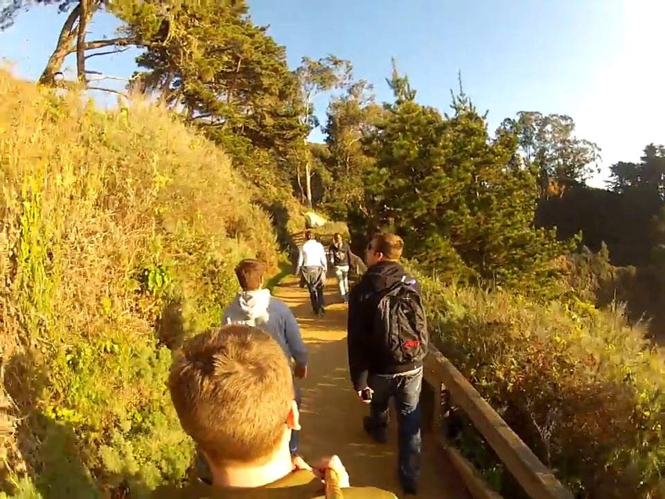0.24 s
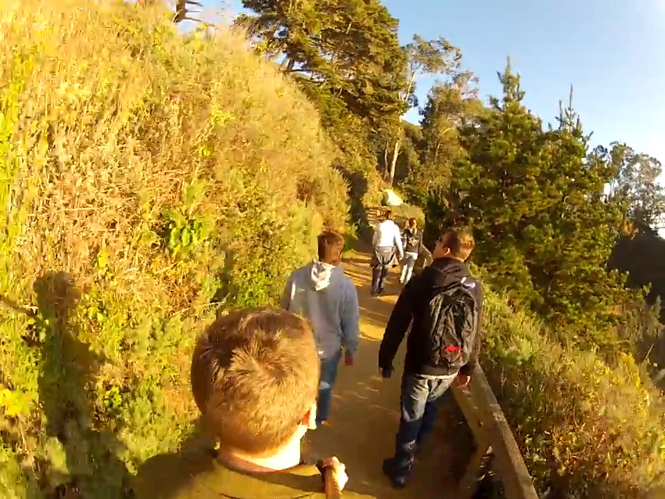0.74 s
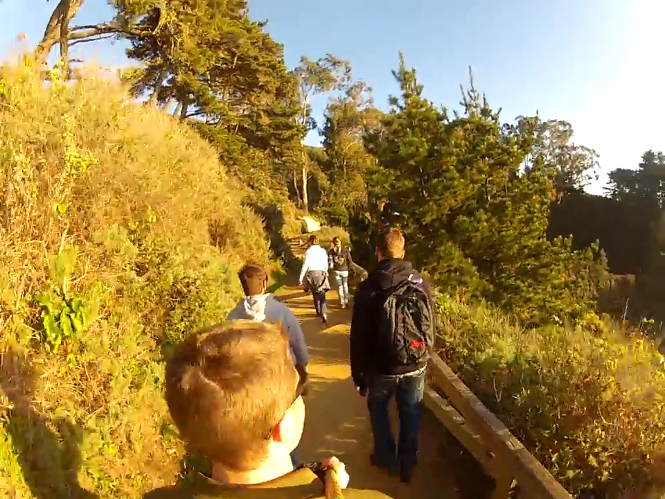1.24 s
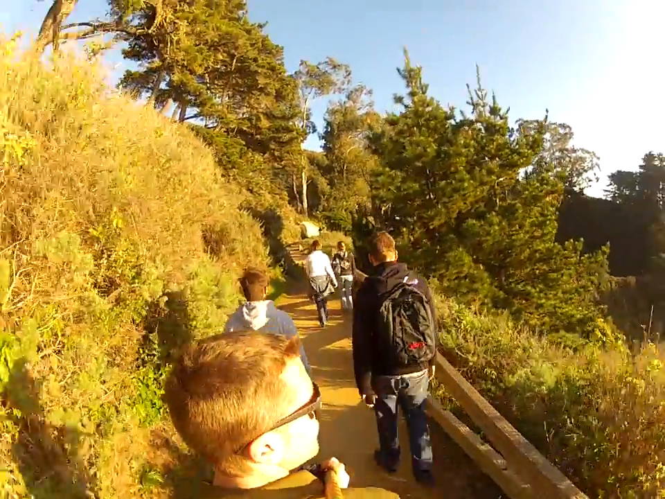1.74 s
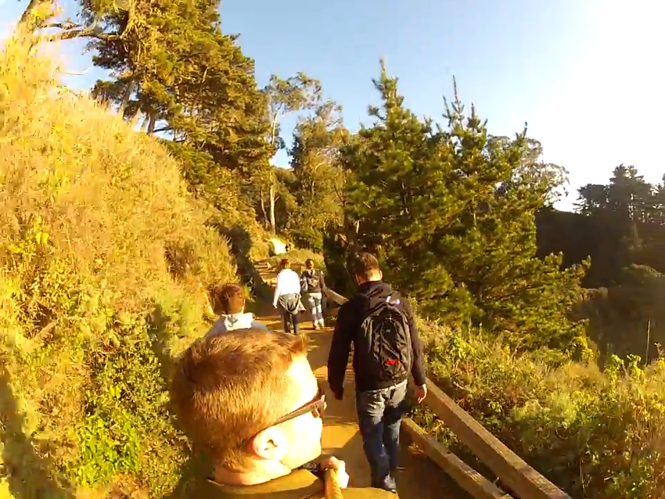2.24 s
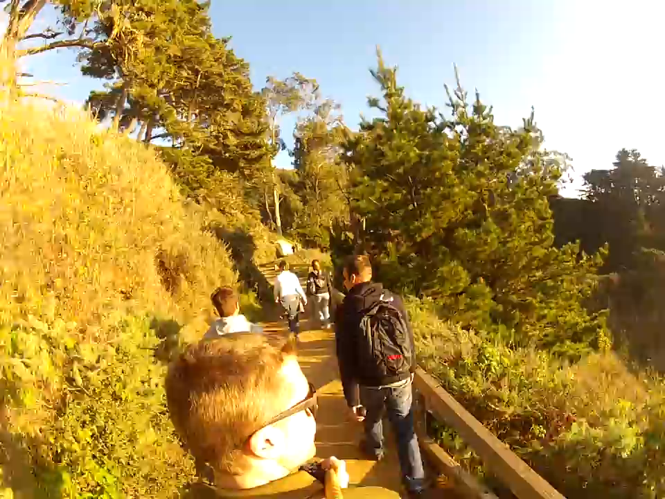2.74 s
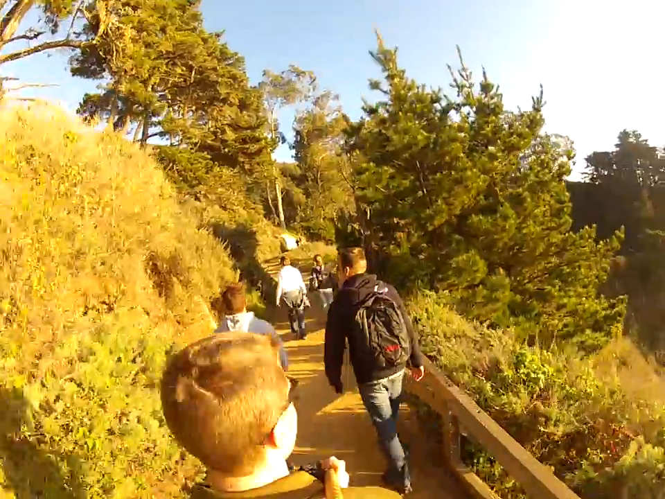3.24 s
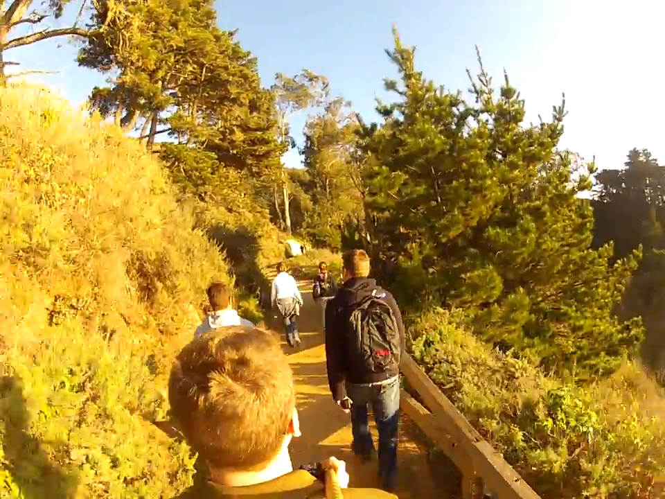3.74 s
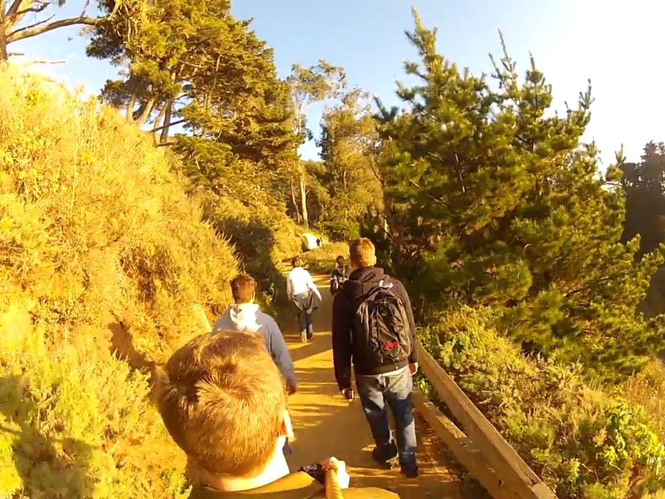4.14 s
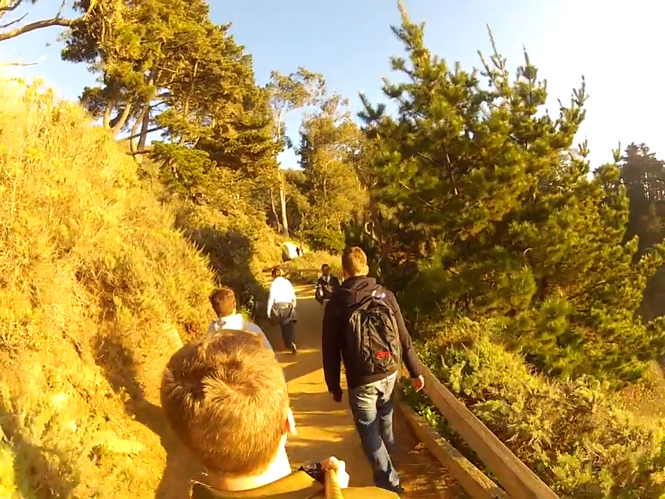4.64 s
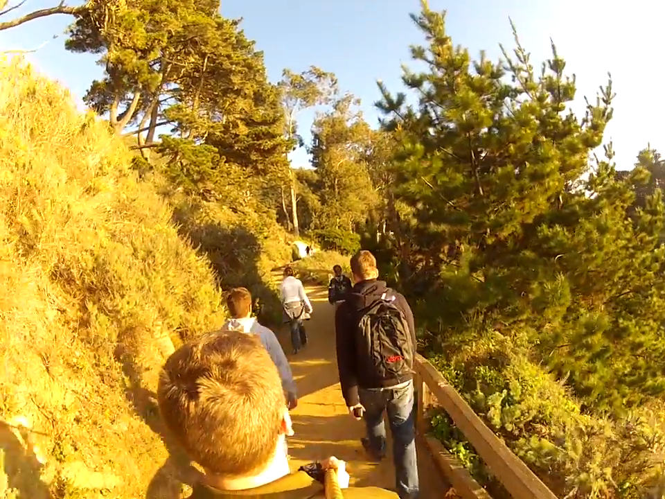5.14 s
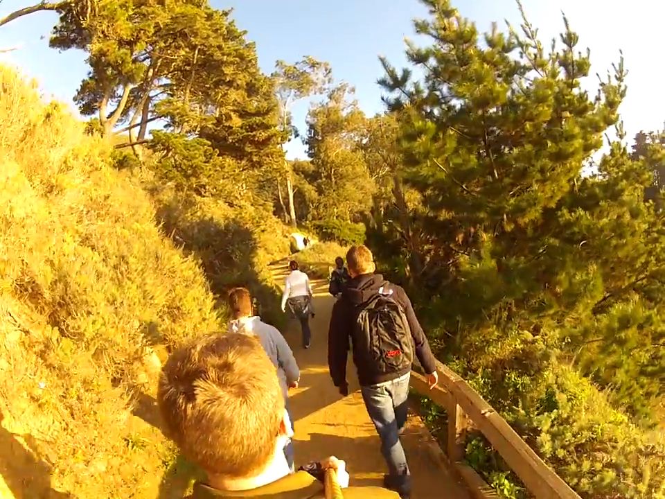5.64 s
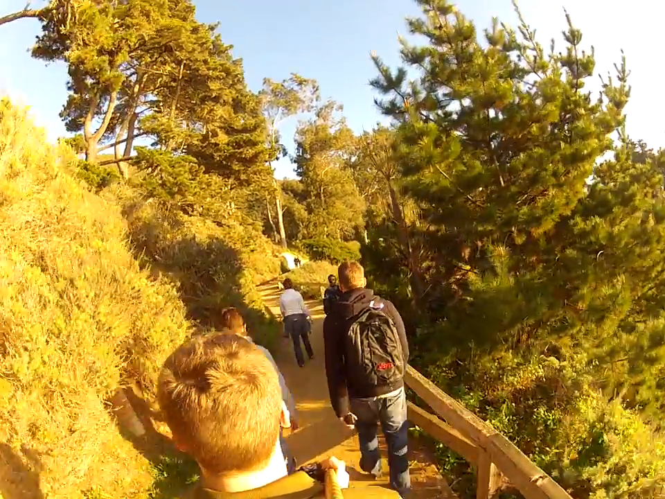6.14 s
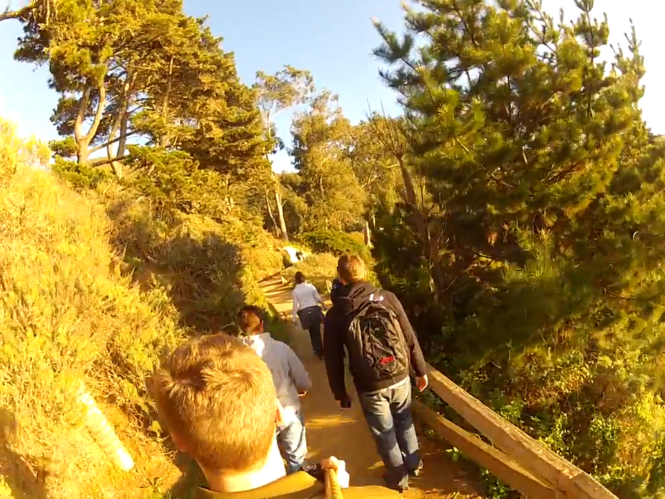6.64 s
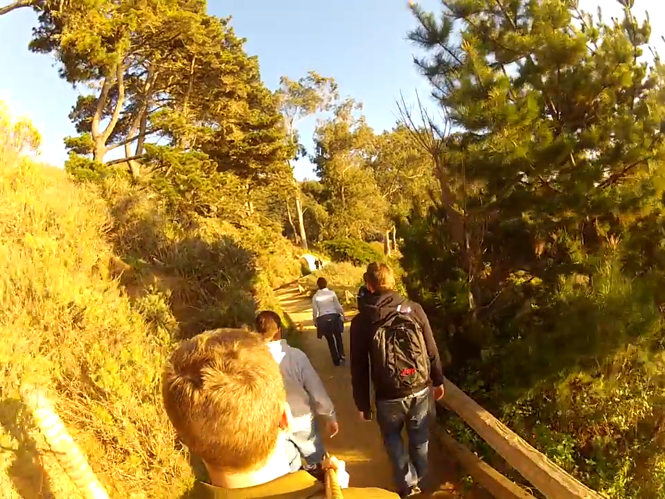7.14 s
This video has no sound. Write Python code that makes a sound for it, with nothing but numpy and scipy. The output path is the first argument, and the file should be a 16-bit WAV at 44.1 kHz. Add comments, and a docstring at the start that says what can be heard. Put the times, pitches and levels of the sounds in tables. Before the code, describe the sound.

A cased camera shakes on its pole: sharp clacks and low thuds in the first second, another burst near two seconds, then quiet ticking and rubbing.

```python
"""Knocks of the mount ring out as a small camera in a sealed plastic case rides a pole along a dirt trail.
Each step shakes the pole: low modes thump and shudder, a deep sine sways, and gritty noise rubs.
All of it rings through the case, over a faint hiss of filtered noise.
The sound is sampled only 8000 times a second and each sample is held, which mirrors it into the treble."""
import sys
import numpy as np
from scipy import signal
from scipy.fft import rfft, irfft
from scipy.io import wavfile
from scipy.ndimage import uniform_filter1d

SR = 44100
rng = np.random.default_rng(int(sys.argv[2]) if len(sys.argv) > 2 else 0)


def attenuation_scalar(level_db):
    """Turn a level in dB into a linear amplitude multiplier (20 dB per decade)."""
    decades = np.asarray(level_db, float) / 20
    return 10 ** decades


def unload_audio(sound):
    """Save the sound as a 16-bit wav file, at the path given as the first command line argument."""
    columns = np.transpose(np.atleast_2d(sound))
    # keep every value between -1 and 1, then stretch to whole-number steps
    steps = np.round(np.clip(columns, -1, 1) * 32767)
    wavfile.write(sys.argv[1], SR, steps.astype(np.int16))


N = 326781  # length in samples

# knocks of the mount: start_s, bright_peak_db, favoured_bright_hz, middle_level_db, contact_decay_s
MOUNT_KNOCKS = [(0.0491, -31, 1860, -45, 0.0091), (0.1322, -6, 2210, -35, 0.0038),
                (0.2183, -14, 1820, -43, 0.0029), (0.298, -38, 2050, -38.5, 0.0051),
                (0.3267, -17.5, 2100, -29, 0.002), (0.3544, -22.5, 2050, -35.5, 0.0031),
                (0.44, -40, 2050, -39.5, 0.005), (0.5857, -29, 2070, -45, 0.011),
                (0.7013, -33, 2040, -40.5, 0.0022), (0.7451, -17.5, 1920, -28, 0.0014),
                (0.8176, -30, 2000, -55, 0.0045), (0.8912, -10, 1780, -23.5, 0.0037),
                (0.9526, -16, 3530, -34, 0.0033), (0.9964, -39, 1570, -55, 0.0046),
                (1.2845, -50, 2020, -52, 0.0058), (1.4473, -37.5, 2080, -68, 0.0079),
                (1.476, -38, 2040, -68, 0.002), (1.5395, -38.5, 2000, -64, 0.01),
                (1.809, -37, 2540, -63, 0.0054), (1.8449, -32, 2230, -65, 0.0026),
                (1.873, -33, 1960, -51, 0.004), (1.908, -10, 1780, -24.5, 0.0028),
                (1.9417, -19, 2300, -29, 0.0031), (2.0058, -19, 2350, -29.5, 0.0027),
                (2.0958, -37.5, 1943, -44, 0.0023), (2.432, -54, 1750, -62, 0.0067),
                (2.5698, -33, 2170, -78, 0.012), (2.606, -31.5, 1850, -64, 0.0039),
                (2.978, -45.5, 1770, -56.5, 0.0018), (3.2207, -40, 2040, -56, 0.011),
                (3.5247, -41, 2570, -58, 0.0032), (3.5418, -45, 2020, -49.5, 0.0032),
                (3.557, -43.5, 2050, -49.5, 0.0062), (3.575, -43, 2070, -56, 0.0027),
                (3.677, -51, 1990, -58, 0.0066), (3.7319, -36.5, 2060, -58.5, 0.0051),
                (3.8427, -28.5, 1550, -56, 0.0056), (3.8683, -33, 1910, -59, 0.0038),
                (4.058, -37.5, 2070, -48, 0.012), (4.121, -30.5, 2020, -45, 0.0041),
                (4.1777, -37, 2040, -52.5, 0.006), (4.6864, -39, 2390, -53, 0.0057),
                (4.716, -37.5, 1970, -59, 0.017), (4.773, -42, 2030, -59, 0.0038),
                (4.803, -43.5, 2300, -66, 0.003), (4.966, -33, 1590, -60, 0.0027),
                (5.2277, -44, 2060, -46, 0.0056), (5.245, -38, 1890, -48, 0.0073),
                (5.2749, -33, 2050, -41.5, 0.012), (5.3084, -35.5, 2220, -51.5, 0.007),
                (5.7762, -37, 1835, -50, 0.0038), (5.8154, -45, 2050, -50, 0.017),
                (5.858, -39, 2300, -50, 0.0045), (6.0195, -25, 2046, -75, 0.006),
                (6.15, -33, 2000, -60, 0.0028), (6.29, -51, 2070, -64, 0.01),
                (6.4074, -35, 2060, -43, 0.0092), (6.441, -38.5, 2100, -51, 0.0089),
                (6.5702, -31, 2300, -68, 0.0037), (6.5994, -29, 2440, -66, 0.0079),
                (6.776, -53, 2050, -58.5, 0.004), (6.9664, -35.5, 2044, -46.5, 0.0052),
                (7.088, -41, 2200, -66, 0.008), (7.1807, -29.5, 2380, -71, 0.0029),
                (7.2218, -33, 2080, -55, 0.0043), (7.25, -38, 2300, -44.5, 0.0035),
                (7.318, -35.5, 2300, -62, 0.0032)]
# soft jolts up the pole: time_s, peak_db, pitch_hz
POLE_THUMPS = [(0.051, -18.5, 238), (0.076, -13, 257), (0.086, -20.5, 250), (0.095, -13, 248),
               (0.14, -15, 250), (0.221, -26, 235), (0.282, -32.5, 83), (0.311, -25, 234),
               (0.328, -17, 239), (0.366, -14, 83), (0.397, -25.5, 246), (0.443, -30, 240),
               (0.565, -17, 221), (0.587, -27, 245), (0.605, -28, 119), (0.676, -34, 81), (0.703, -22, 86),
               (0.749, -9.5, 223), (0.772, -34, 75), (0.788, -33, 70), (0.895, -6, 235.4),
               (0.956, -23.5, 234), (0.996, -30, 230), (1.231, -34, 85.5), (1.321, -32.5, 81),
               (1.589, -32.5, 79.2), (1.912, -14.5, 237), (1.943, -17, 219), (2.01, -18, 229.2),
               (2.041, -24.5, 244), (2.067, -24, 248), (2.097, -23.5, 247), (2.159, -35, 237),
               (2.434, -39.5, 110.4), (2.617, -37, 82.4), (2.703, -35.5, 82.5), (2.978, -36, 96.3),
               (3.035, -45, 94), (3.265, -40.5, 82.5), (3.526, -29.5, 149), (3.547, -27, 222),
               (3.559, -28.5, 191), (3.576, -29.5, 92), (3.678, -35, 112), (3.741, -36, 92.5),
               (4.062, -24, 77), (4.092, -33, 68), (4.123, -21, 225), (4.15, -32, 196), (4.178, -29.5, 117),
               (4.43, -41.5, 86), (4.688, -25, 200), (4.721, -26, 211), (4.775, -37, 101),
               (4.946, -35, 86.7), (4.968, -37, 80.3), (4.989, -37.5, 74), (4.89, -44, 240),
               (5.031, -38.5, 250), (5.231, -32, 70), (5.242, -28, 248), (5.274, -21, 99), (5.314, -27, 79),
               (5.569, -37, 78.4), (5.6, -38, 245.5), (5.778, -30.5, 89), (5.82, -24.5, 244),
               (5.864, -24, 194), (5.898, -25.5, 158), (6.03, -40, 214), (6.142, -46, 80.3),
               (6.154, -35, 80.6), (6.385, -38, 200.7), (6.411, -24, 209), (6.444, -25, 155.7),
               (6.966, -33, 98.5), (6.99, -31, 118), (7.027, -26, 215), (7.043, -53, 256.7),
               (7.257, -31.5, 85.6), (7.324, -40, 83.5)]
# swings that bend the pole: widest_s, level_db, pitch_hz, fade_db_per_s (as the grip damps it)
POLE_SWINGS = [(0.07, -31, 32.2, 400), (0.225, -29, 32.4, 400), (0.37, -28, 36.5, 70), (0.58, -30, 36, 250),
               (0.75, -23.5, 31.45, 41), (0.95, -25.5, 31.95, 187), (1.14, -53, 32.58, 100),
               (1.24, -39, 35.7, 41), (1.61, -47.5, 34.14, 32), (1.94, -22, 33.7, 58),
               (2.05, -25.5, 32.85, 220), (2.19, -47.5, 31.5, 30), (2.34, -44, 30.7, 40),
               (2.44, -40, 31.54, 120), (2.55, -44.5, 32.43, 57), (2.858, -48, 33.53, 80),
               (3.06, -38, 29.93, 143.5), (3.25, -46, 27.6, 15), (3.46, -47, 27.23, 100),
               (3.61, -49, 28.6, 122), (3.97, -49, 30.1, 16), (4.15, -37.5, 31.3, 70),
               (4.26, -43, 31.96, 118), (4.51, -44, 33.24, 18), (4.66, -54, 32.04, 100),
               (4.93, -53, 28.5, 69), (5.3, -38, 31.27, 64), (5.52, -46, 31.4, 60), (5.74, -53, 32.9, 30),
               (5.82, -40, 33.32, 89), (6.0, -43, 33.07, 18), (6.16, -50, 33.1, 80), (6.3, -52, 33.1, 100),
               (6.46, -32.5, 28.77, 152), (6.66, -42.5, 32.27, 150), (6.859, -47, 32.65, 82),
               (7.02, -32.5, 29.25, 300), (7.09, -41, 29, 60), (7.17, -38.5, 32.5, 248)]
# strokes of rubbing in mount and grip: middle_s, length_s, bright_level_db, middle_level_db
RUB_STROKES = [(0.0, 0.046, -32.5, -40), (0.083, 0.1, -32.5, -33.5), (0.196, 0.18, -48, -53),
               (0.28, 0.16, -36, -47), (0.345, 0.052, -34.5, -32), (0.395, 0.24, -40, -46.5),
               (0.559, 0.14, -37, -41), (0.741, 0.17, -41, -45.5), (0.82, 0.066, -44.5, -43),
               (0.909, 0.092, -51, -66), (1.009, 0.095, -43, -49.5), (1.186, 0.13, -55.5, -61),
               (1.321, 0.14, -48.5, -53.5), (1.393, 0.15, -57.5, -72), (1.578, .1, -39.5, -48.5),
               (1.85, 0.26, -56.5, -59), (1.931, 0.089, -49, -53), (2.05, 0.18, -55.5, -54),
               (2.449, 0.13, -57.5, -67), (2.577, 0.19, -52, -75), (2.701, 0.17, -53, -61.5),
               (3.257, 0.14, -46.5, -55.5), (3.543, 0.065, -57, -62), (3.751, 0.15, -51, -65),
               (3.833, 0.14, -47.5, -50.5), (4.103, 0.15, -46.5, -45), (4.427, 0.14, -50, -59),
               (4.699, .13, -48, -48.5), (4.931, 0.22, -47, -54.5), (5.246, .15, -48, -43),
               (5.547, 0.2, -51.5, -56), (5.825, 0.14, -48.5, -49.5), (5.897, 0.059, -58, -55.5),
               (6.044, 0.064, -42.5, -52), (6.097, 0.19, -45.5, -55), (6.41, 0.15, -57, -52),
               (6.601, .06, -47.5, -55), (6.695, 0.19, -47.5, -55), (7.016, 0.094, -53.5, -59),
               (7.257, 0.21, -44, -55.5)]
# contact spots that rub: favoured_bright_hz, favoured_middle_hz
RUB_SPOTS = [(1700, 697), (2200, 1070), (2600, 1198)]
# modes of pole and case, in three ranges: pitch_hz, relative_level_db, t60_s
LOW_RESONANCES = [(62, -6, .12), (85, -3, .12), (120, -7, .08), (190, -5, .1), (222, -5, .09), (257, 0, .2)]
MIDDLE_RESONANCES = [(354, -7, .08), (438, -5, .1), (580, -11, .15), (742, -13, .09), (952, -5, .07),
                     (990, 0, .025), (1198, -12, .06)]
BRIGHT_RESONANCES = [(1594, -0.5, 0.025), (2005, 4.5, 0.016), (2170, 6, 0.019), (2300, 1.5, 0.0095),
                     (2420, -10.5, 0.032), (2683, -8.5, 0.04), (3050, -36, 0.013), (3280, -11, 0.019),
                     (3560, -3, 0.016), (3800, -20, 0.012)]
# pitches the case barely passes: pitch_hz, width_hz
CASE_DEAD_SPOTS = [(308, 98), (680, 35), (1280, 72), (1440, 142), (1750, 20), (2065, 77), (3060, 72)]
# spectral shape of the hiss: frequency_hz, relative_level_db
HISS_SHAPE = [(24, -30), (40, -50), (59, 1), (136, -11), (257, -5), (317, -53), (502, -25.5), (963, -23.5),
              (1740, -29), (2190, -30.5), (3900, -30.5), (5070, -107), (8580, -120)]


def knocks():
    """A short ragged contact sets off the bright modes; its first blunt push rings the middle ones cleanly."""
    out = np.zeros(N)
    t = np.arange(1300) / SR
    middle_body = ring(MIDDLE_RESONANCES) + 0.78 * ring(MIDDLE_RESONANCES, 952, focus_db=167)
    for start_s, bright_db, bright_hz, middle_db, decay_s in MOUNT_KNOCKS:
        onset = np.minimum(t / 0.00077, 1)
        contact = rng.standard_normal(len(t)) * onset * np.exp(-t / decay_s)
        bright = signal.fftconvolve(contact, ring(BRIGHT_RESONANCES, bright_hz, focus_db=62, most_db=13))
        push = 4.5 * np.exp(-((t - 0.001) / 0.000053) ** 2) + contact
        middle = signal.fftconvolve(push, middle_body)
        middle /= np.sqrt(np.mean(middle[:700] ** 2))  # level over the first 16 ms
        add(out, start_s, attenuation_scalar(bright_db) * bright / abs(bright).max() + attenuation_scalar(middle_db) * middle)
    return out


def thumps():
    """A rounded push rings the low modes near its pitch; the grip damps part of it, the rest rings on."""
    out = np.zeros(N)
    t = np.arange(SR // 8) / SR
    for time_s, peak_db, pitch_hz in POLE_THUMPS:
        grip = attenuation_scalar(-4.0 * pitch_hz * t)  # this part loses 4 dB each cycle
        damped = ring(LOW_RESONANCES, pitch_hz, focus_db=49.0) * (grip + 1.86)
        push = np.hanning(round(0.6 * SR / pitch_hz))
        jolt = signal.fftconvolve(push, damped)
        add(out, time_s - 0.0005, -attenuation_scalar(peak_db) * jolt / abs(jolt).max())
    return out


def sway():
    """The pole bends like a slow reed; each swing takes over from the last, and the pitch drifts with the grip."""
    rise_db_per_s, rest_db = 394, -57
    widest_s, level_db, pitch_hz, fade_db_per_s = np.transpose(POLE_SWINGS)
    hz = np.interp(np.arange(N) / SR, widest_s, pitch_hz)
    next_s = np.append(widest_s[1:], N / SR)
    replaced_db = -rise_db_per_s * np.maximum(since(next_s), 0)
    shapes_db = peaked(widest_s, level_db, rise_db_per_s, fade_db_per_s) + replaced_db
    sine = np.sqrt(2) * np.sin(2 * np.pi * np.cumsum(hz) / SR)
    return attenuation_scalar(swells(rest_db, shapes_db)) * sine


def shudder():
    """Small jolts of the hand stir the low modes around each thump; deep thumps stir the lowest more."""
    time_s, peak_db, pitch_hz = np.transpose(POLE_THUMPS)
    deep = pitch_hz < 140
    rise_db_per_s = 1600
    # the stirring peaks this far below its thump: after a deep thump, after a higher one
    upper_peak_db = peak_db + np.where(deep, -10, -12.5)
    lowest_peak_db = peak_db + np.where(deep, -7, -17)
    upper_db = swells(-63.5, peaked(time_s, upper_peak_db, rise_db_per_s, 686))
    lowest_db = swells(-60, peaked(time_s, lowest_peak_db, rise_db_per_s, 490))
    jolts = evened(grit(200, 1.6, 0.72))
    return rung(jolts, upper_db, LOW_RESONANCES[3:]) + rung(jolts, lowest_db, LOW_RESONANCES[:3])


def rubbing():
    """Slips come in clumps at three spots of contact; each spot has its own colour and its own clumps."""
    ends_db, squareness = -19.5, 1.62  # relative level at a stroke's ends; higher = flatter middle
    middle_s, length_s, bright_peak_db, middle_peak_db = np.transpose(RUB_STROKES)
    arch_db = ends_db * abs(2 * since(middle_s) / length_s[:, None]) ** squareness
    bright_db = swells(-66.5, bright_peak_db[:, None] + arch_db)
    middle_db = swells(-73.5, middle_peak_db[:, None] + arch_db)
    out = np.zeros(N)
    for bright_hz, middle_hz in RUB_SPOTS:
        clumps = attenuation_scalar(4.93 * evened(wander(400, 200)))
        slips = evened(clumps * grit(700, 4.53, 0.44)) / np.sqrt(len(RUB_SPOTS))
        out += rung(slips, bright_db, BRIGHT_RESONANCES, bright_hz)
        out += rung(slips, middle_db, MIDDLE_RESONANCES, middle_hz)
    return out


def hiss():
    """Faint noise of the microphone and the muffled outdoors, wavering a little."""
    shape_hz, shape_db = np.transpose(HISS_SHAPE)
    hz = np.fft.rfftfreq(N, 1 / SR)
    shape = attenuation_scalar(np.interp(np.log(hz + 1), np.log(shape_hz + 1), shape_db))
    above = np.sqrt(np.mean((shape * (hz > 300)) ** 2))  # the level is set by the part above 300 Hz
    noise = irfft(rfft(rng.standard_normal(N)) * shape / above, N)
    waver = attenuation_scalar(3.3 * evened(wander(2500, 1500)))
    return attenuation_scalar(-69.5) * waver * noise


def ring(modes, favoured_hz=None, focus_db=0, most_db=40):
    """Decaying sines answer one click; modes lose focus_db per octave from a favoured pitch, up to most_db."""
    hz, db, t60 = np.transpose(modes)[:, :, None]
    t = np.arange(SR // 8) / SR
    if favoured_hz:
        db = db - np.minimum(focus_db * abs(np.log2(hz / favoured_hz)), most_db)
    decay = attenuation_scalar(db - 60 * t / np.maximum(t60, 0.004))
    return (decay * np.sin(2 * np.pi * hz * t)).sum(0)


def rung(drive, level_db, modes, favoured_hz=None):
    """A steady drive at a changing level rings a set of modes."""
    body = ring(modes, favoured_hz, focus_db=43.5, most_db=18.5)
    return signal.oaconvolve(drive * attenuation_scalar(level_db), body / np.linalg.norm(body))[:N]


def grit(per_s, spread_db, smooth):
    """Tiny slips of uneven size over a share of smooth friction noise."""
    sizes = attenuation_scalar(spread_db * np.minimum(rng.exponential(1, N), 4))
    slips = sizes * (rng.random(N) < per_s / SR)
    signs = np.sign(rng.standard_normal(N))
    return evened(slips * signs) + smooth * rng.standard_normal(N)


def wander(first, second):
    """Noise averaged twice, over two spans in samples, drifts slowly."""
    return uniform_filter1d(uniform_filter1d(rng.standard_normal(N), first), second)


def evened(x):
    """Scales a signal to an rms of one."""
    return x / np.sqrt(np.mean(x ** 2) + 1e-20)


def add(mix, start_s, sound):
    """Lays a sound into the mix at its start time, cut off at the end of the mix."""
    part = mix[max(round(start_s * SR), 0):][:len(sound)]
    part += sound[:len(part)]


def since(s):
    """Time from each event in seconds, one row per event, on a clock of 64-sample ticks."""
    return np.arange(0, N + 64, 64) / SR - s[:, None]


def peaked(s, peak_db, rise, fade):
    """Rises to a peak and fades from it, both straight in dB (rates in dB per s)."""
    t = since(s)
    return peak_db[:, None] + np.minimum(rise * t, -np.reshape(fade, (-1, 1)) * t)


def swells(rest_db, shapes_db):
    """Level in dB at every sample: the powers of a resting level and of each event's shape add up."""
    power = attenuation_scalar(rest_db) ** 2 + (attenuation_scalar(shapes_db) ** 2).sum(0)
    return np.interp(np.arange(N), np.arange(len(power)) * 64, 10 * np.log10(power))


def scene():
    """The shaking reaches the microphone through the case, which dulls its dead spots; hiss lies beneath."""
    mix = knocks() + thumps() + sway() + shudder() + rubbing()
    for hz, width_hz in CASE_DEAD_SPOTS:
        notched = signal.lfilter(*signal.iirnotch(hz, hz / width_hz, SR), mix)
        mix = 0.25 * mix + 0.75 * notched
    return (mix + hiss())[None]


def roll_off(x):
    """The treble ends steeply here."""
    return signal.sosfilt(signal.butter(12, 16510, fs=SR, output="sos"), x)


def record(dry):
    """Band limit, sampling at 8000 Hz, each sample held six times, then back to the output rate."""
    limited = signal.oaconvolve(dry, signal.firwin(151, 3930, fs=SR)[None], "same")
    slow = signal.resample_poly(limited, 80, 441, axis=1)
    held = np.repeat(slow, 6, axis=1)  # 48000 Hz, with mirror images in the treble
    restored = signal.resample_poly(held, 147, 160, axis=1)[:, :N]
    edge = signal.firwin(201, 15250, window=("kaiser", 2.5), fs=SR)  # treble limit
    finished = signal.oaconvolve(restored, edge[None], "same")
    return roll_off(finished)


dry = scene()
out = record(dry)
unload_audio(out)
```